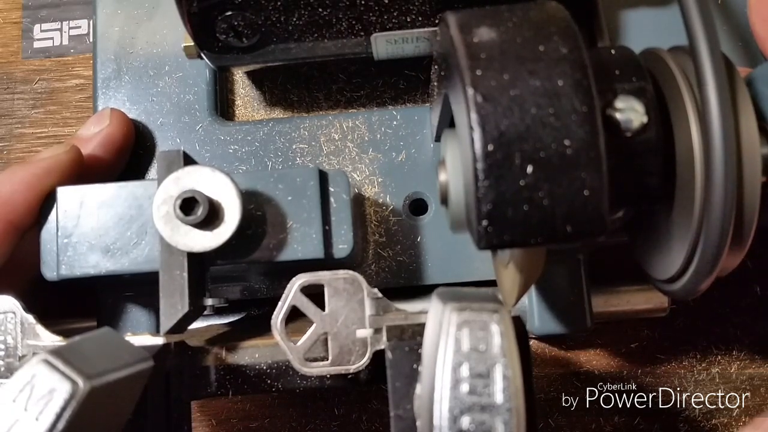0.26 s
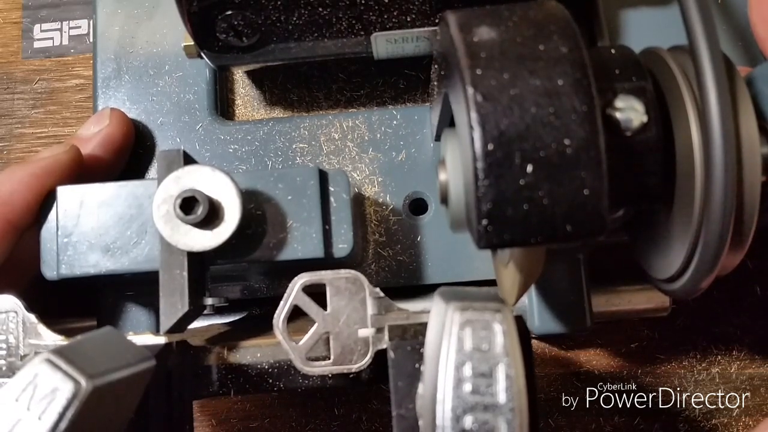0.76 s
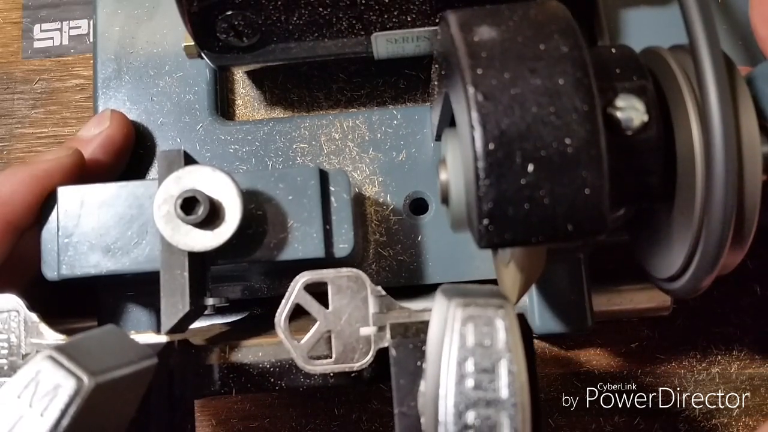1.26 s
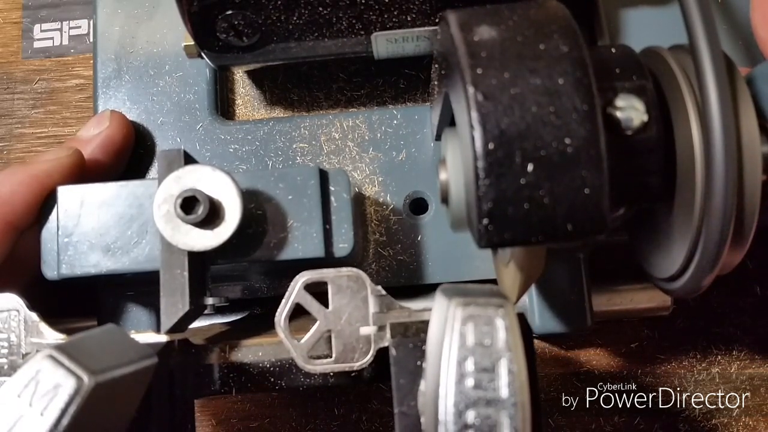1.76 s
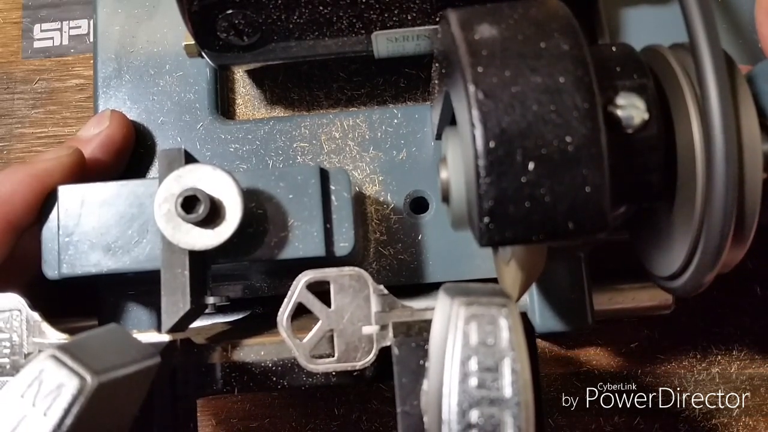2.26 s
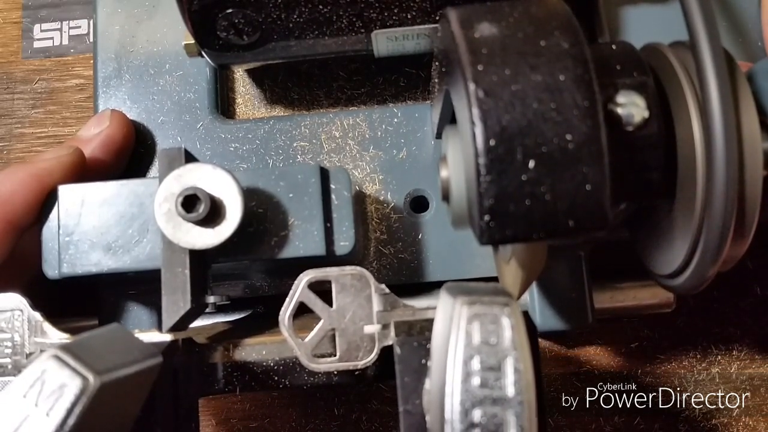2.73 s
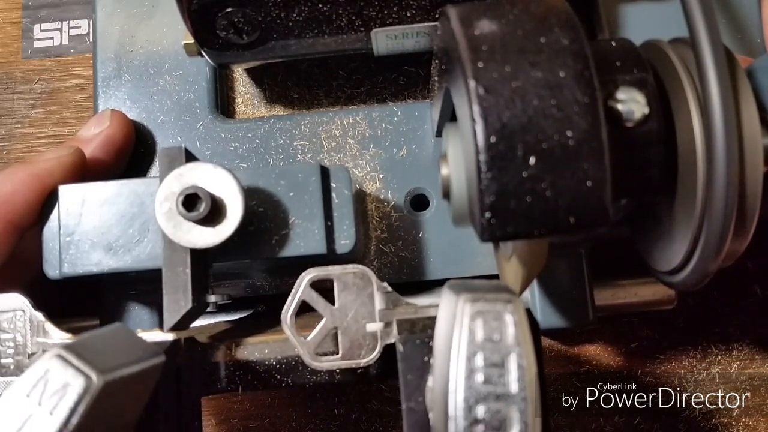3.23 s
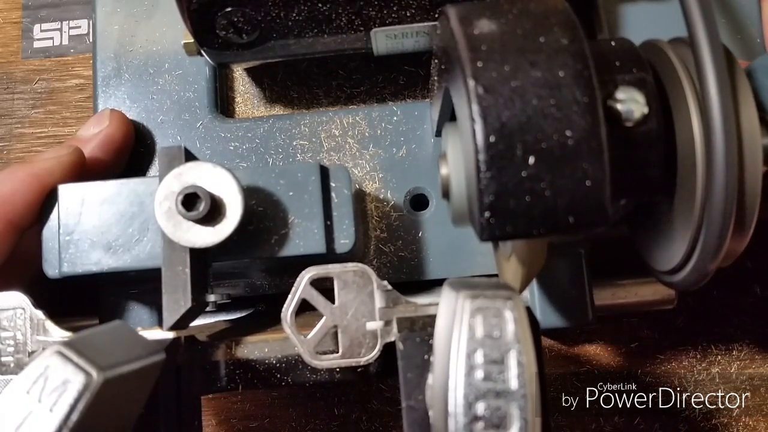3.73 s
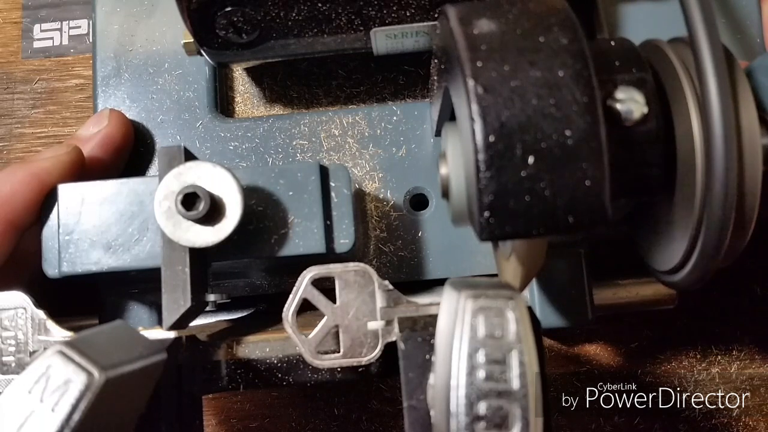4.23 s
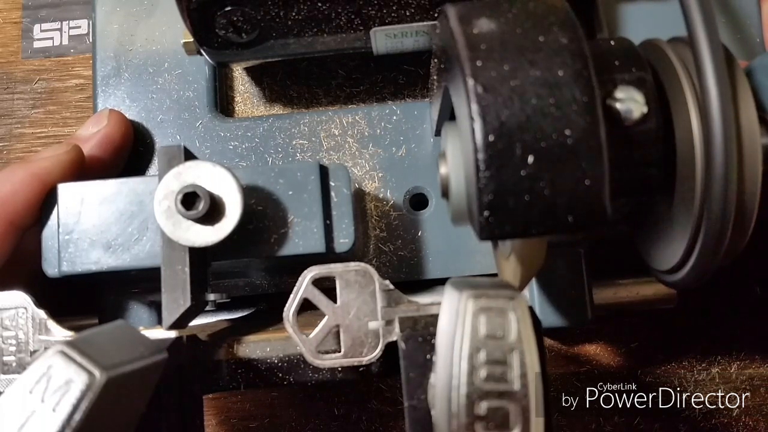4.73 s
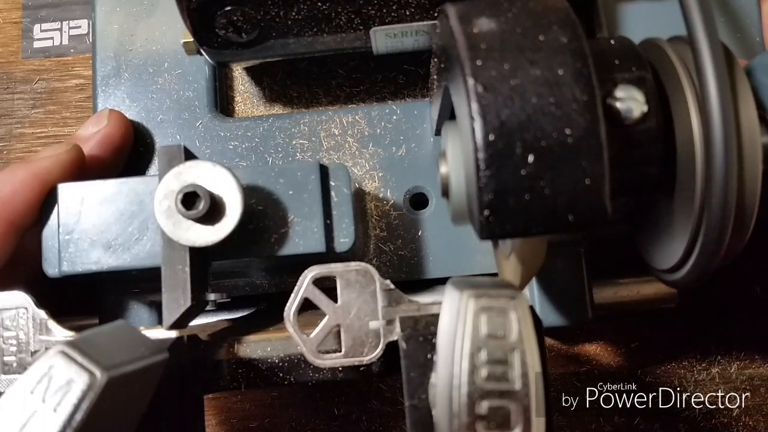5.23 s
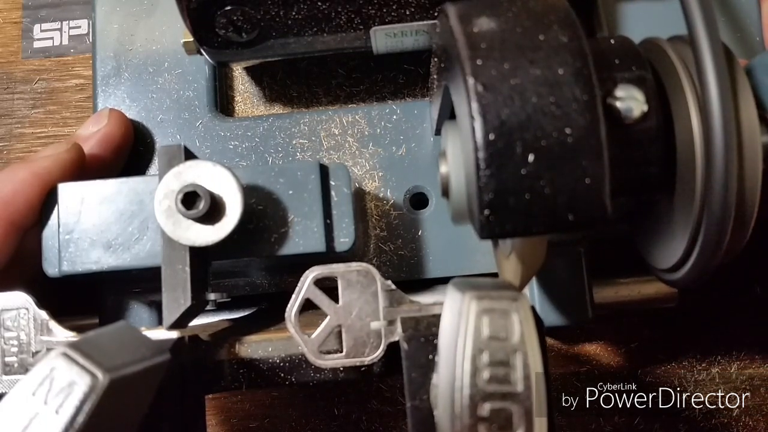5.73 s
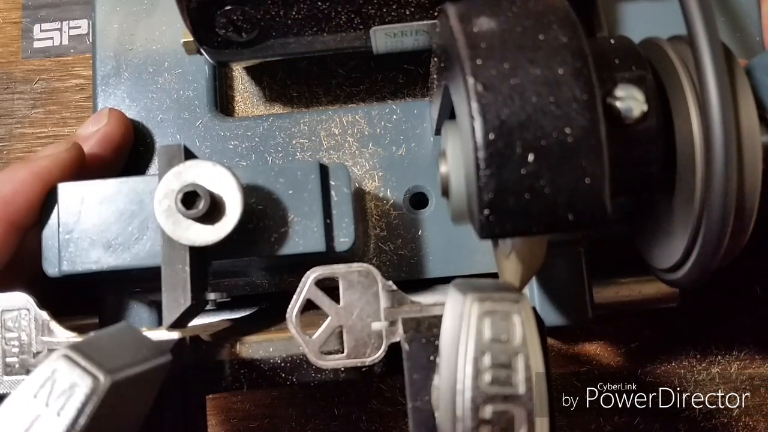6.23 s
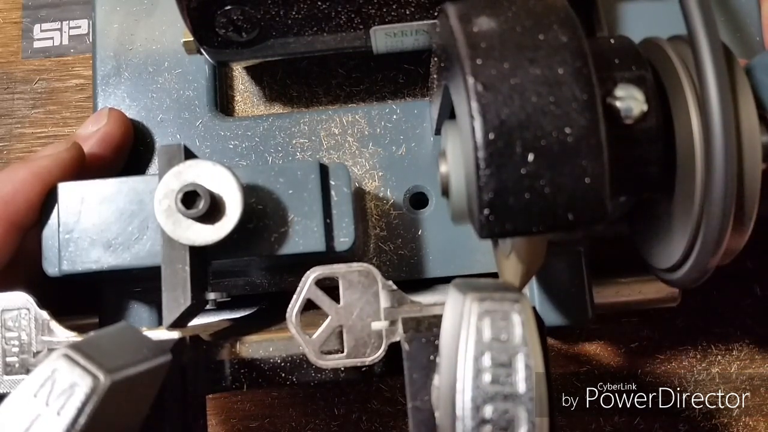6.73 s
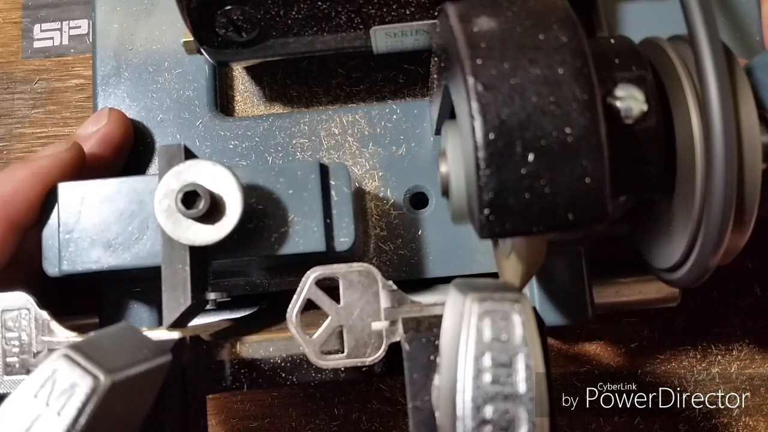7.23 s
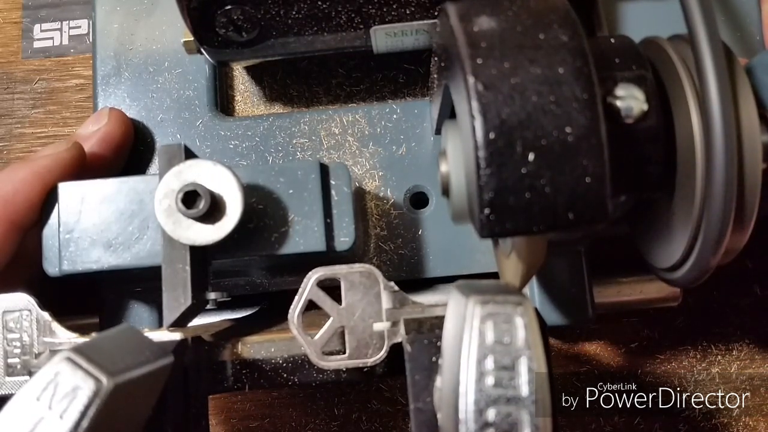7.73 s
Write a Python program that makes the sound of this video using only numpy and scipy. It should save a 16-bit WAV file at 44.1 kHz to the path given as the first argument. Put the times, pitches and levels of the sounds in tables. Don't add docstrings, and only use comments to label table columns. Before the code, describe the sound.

Continuous low motor drone with a rough grinding bed and rapid, grouped metal chatter as a small bench machine cuts a key, never stopping.

```python
import sys
import numpy as np
from scipy import signal
from scipy.fft import rfft, irfft, next_fast_len
from scipy.io import wavfile
from scipy.ndimage import uniform_filter1d, minimum_filter1d

SR = 44100
rng = np.random.default_rng(int(sys.argv[2]) if len(sys.argv) > 2 else 0)


def ratio_of_db(decibels):
    return 10 ** (np.asarray(decibels, float) / 20)


def pcm_store(signal):
    levels = np.round(np.clip(np.atleast_2d(signal), -1, 1) * 32767)
    wavfile.write(sys.argv[1], SR, levels.astype(np.int16).T)


N = 351918
COARSE = 40
MAINS_PULL_HZ = 120

# start_s, first_order_db, second_order_db
HUM_LEVELS = [(0, -10, -16), (.6, -9, -17), (1.2, -9.5, -17), (1.5, -12.5, -16), (1.85, -12, -15.5),
              (2.05, -10, -16), (2.6, -10, -16.5), (3.2, -9.5, -15.5), (3.55, -12.5, -16), (4.3, -12, -15),
              (5.2, -12, -14.5), (5.75, -12, -13.5), (6.3, -14, -13.5), (7, -12, -13.5),
              (7.98, -12.4, -12.5)]


def in_time(rows):
    s, *columns = np.transpose(rows)
    return [np.interp(np.arange(N) / SR, s, column) for column in columns]


def rms_one(x):
    return x / np.sqrt(np.mean(x ** 2) + 1e-20)


def turns(hz):
    return 2 * np.pi * np.cumsum(hz) / SR


def drift(rate_hz):
    r = np.exp(-2 * np.pi * COARSE * rate_hz / SR)
    noise = rng.standard_normal(N // COARSE + 2002)
    slow = signal.lfilter([1], [1, -2 * r, r * r], noise)[2000:]
    return np.interp(np.arange(N) / COARSE, np.arange(len(slow)), rms_one(slow - slow.mean()))


def spell(start_s, end_s):
    settle_s = 0.092
    s = np.arange(0, N, COARSE) / SR
    on = (np.tanh((s - start_s) / settle_s) - np.tanh((s - end_s) / settle_s)) / 2
    return np.interp(np.arange(N) / SR, s, on)


def lifted():
    # at_s, level_db (negative dips, positive lifts the group)
    lifts = [(0.92, -7.5), (1.194, -4.5), (1.461, -14), (1.64, -22.5), (1.685, -7), (1.958, -2),
             (2.188, -20), (2.641, -8.5), (2.865, -15.5), (3.092, -12.5), (3.229, -7.5), (3.365, -2),
             (3.723, -7), (3.858, -8), (3.948, -7), (4.084, -7), (4.353, -13.5), (4.487, -8), (4.621, 0.5),
             (4.666, -12.5), (5.343, -14.5), (5.615, -10), (5.69, -14), (5.791, -16), (6.241, -2),
             (6.656, -9.5), (7.482, -24), (7.755, -20)]
    s = np.arange(0, N, COARSE) / SR
    dips = sum(db * np.exp(-((s - at_s) / 0.019) ** 4) for at_s, db in lifts)
    return np.interp(np.arange(N) / SR, s, dips)


def colour(x, points, humps=()):
    size = next_fast_len(N)
    hz = np.fft.rfftfreq(size, 1 / SR) + 1
    points_hz, points_db = np.transpose(points)
    gain_db = np.interp(np.log(hz), np.log(points_hz), points_db)
    for centre_hz, width_hz, db in humps:
        gain_db += db / (1 + (2 * (hz - centre_hz) / width_hz) ** 2)
    return irfft(rfft(x, size) * ratio_of_db(gain_db), size)[:N]


def sine(phase, rms_db):
    return np.sqrt(2) * ratio_of_db(rms_db) * np.cos(phase)


def tone(phase, rms_db, unsteady_db):
    level_db = rms_db + unsteady_db * drift(2.4)
    return sine(phase + rng.uniform(0, 2 * np.pi) + 0.33 * drift(3.0), level_db)


def hum(tooth, wobble):
    # tooth_multiple, wobble_multiple, resting_db, share_of_second_swing
    seated_tones = [(3, 0, -43.5, .1), (4, 0, -51, -.1), (5, 0, -49, .3), (6, 0, -30, 1.2),
                    (10, 0, -38.5, .9), (1, -1, -48, .1)]
    # start_s, end_s, tooth_multiple, level_db
    seating = [(0.36, 1.05, 3, 9), (1.46, 1.8, 3, 7.5), (2.95, 3.55, 3, 9.5), (4.7, 6.2, 3, 9.5),
               (6.5, 7.8, 3, 9), (7.2, 8.2, 3, 6), (1, 6.5, 4, 16.5), (2.95, 3.5, 5, 8.5), (1.1, 17, 5, 8),
               (5.3, 7, 5, 5), (3.5, 7.5, 1, 7.5), (5.5, 6, 1, 2)]
    # tooth_multiple, level_db
    upper = [(7, -37), (8, -39), (9, -41), (11, -44), (12, -46), (13, -48), (20, -57)]
    first_db, second_db = in_time(HUM_LEVELS)
    lead = 2.35 + .16 * (first_db - first_db.mean())
    out = sine(tooth, first_db + 0.5 * drift(13) + 0.36 * drift(1.4))
    second_phase = 2 * tooth + lead + 0.3 * drift(0.83)
    out += sine(second_phase, second_db + 0.56 * drift(9) + .7 * drift(5.8))
    swing_db = second_db - second_db.mean()
    for a, b, rest_db, share in seated_tones:
        seated_db = sum(up_db * spell(start_s, end_s) for start_s, end_s, k, up_db in seating if k == a)
        out += tone(a * tooth + b * wobble, rest_db + seated_db + share * swing_db, unsteady_db=.8)
    for k, db in upper:
        out += tone(k * tooth, db - .8, unsteady_db=3.0)
    return out


def side_tones(tooth, wobble):
    # tooth_multiple, wobble_multiple, mains_pull_multiple, level_db
    mixtures = [(0, 0, 1, -49), (0, 1, 0, -53.5), (1, 1, 0, -34), (1, 2, 0, -40), (1, 3, 0, -42),
                (2, -1, 0, -39), (2, 0, -1, -36), (2, 1, 0, -40), (3, -2, 0, -35), (3, -1, 0, -39.5),
                (3, 0, -1, -39.5), (3, 0, 1, -44), (4, -2, 0, -44.5), (4, 0, 1, -51), (4, 0, 2, -51),
                (4, 2, 0, -46), (5, 0, 1, -50.5), (5, 0, 2, -51), (8, 0, 2, -44.5), (10, 0, 1, -40),
                (10, 0, 2, -42.5), (11, 0, 1, -53), (11, 0, 2, -55.5), (20, 0, -1, -62), (20, 0, 1, -59)]
    pull = turns(np.full(N, MAINS_PULL_HZ))
    return sum(tone(a * tooth + b * wobble + c * pull, db - 0.5, unsteady_db=3.0)
               for a, b, c, db in mixtures)


def whines():
    # pitch_hz, level_db, wander_hz
    rotor = [(177.3, -47.5, 0.16), (220.3, -43.5, 0.18), (241.7, -41.5, 0.21), (303, -46, 0.72)]
    # pitch_hz, level_db, wander_hz
    whistles = [(7715, -77, 6), (8495, -75, 6), (9001, -75, 6), (10471, -78, 5), (11197, -81, 5),
                (11573, -81, 6), (11730, -78, 5), (12125, -77, 8), (13776, -86, 5), (14660, -81, 10),
                (14700, -79, 8), (14880, -86, 8)]
    return sum(sine(turns(hz + wander_hz * drift(7.0)), db + 3.6 * drift(1.1))
               for hz, db, wander_hz in [*rotor, *whistles])


def knocks(tooth, wobble, knock_db, bright_db):
    # pitch_hz, width_hz, level_db
    modes = [(1220, 830, -3), (1577, 170, 5.5), (1940, 390, -12.5), (2420, 68, -2), (2590, 100, -3),
             (2806, 55, -2), (3003, 96, -2.5), (3265, 100, 2.5), (3430, 83, -8), (4050, 190, -11),
             (4170, 950, -17.5), (4860, 270, -14.5), (5370, 82, -11), (5800, 150, -12.5),
             (5890, 120, -13.5), (6230, 46, -23), (8500, 710, -27.5)]
    # start_s, grip (0-1)
    key_grip = [(0, 0), (1, 0.5), (1.6, 0.6), (2.5, 0.7), (3.5, 0.7), (4.5, 0.6), (5.3, 0.8), (5.8, 1),
                (6.3, .95), (6.7, 0.8), (7.1, 0.3), (7.98, 0.6)]
    knock_at, lean_at = 3.95, 5.45
    jaw_hz, vice_above_hz = 3300, 4500
    at = np.flatnonzero(np.diff(np.floor((tooth - knock_at) / (2 * np.pi))) > 0)
    luck = rng.standard_normal((len(at), 3 + 2 * len(modes)))
    grip = np.clip(in_time(key_grip)[0], 0, 1)
    out_of_step = (.1 + .6 * spell(1.9, 5.7)) * drift(8.0)
    lean = np.cos(wobble[at] - lean_at + out_of_step[at])
    strength_db = 12 * np.tanh(2.4 * (lean - .62 + .4 * grip[at]))
    strength_db += 5 * (1 - grip[at]) * lean + 1.2 * luck[:, 0]
    at = at + (SR * (.0008 * (1 - lean) + .0002 * luck[:, 1])).astype(int)
    bounce = at + (SR * (.0021 + .0003 * luck[:, 2])).astype(int)
    at, bounce = np.clip(at, 0, N - 1), np.clip(bounce, 0, N - 1)
    fade = np.exp(-1 / (0.0015 * SR))
    scatter, out = rng.standard_normal(N), np.zeros(N)
    for k, (hz, width_hz, db) in enumerate(modes):
        vice = hz > vice_above_hz
        bounce_db = 0 if vice else -6
        blows = np.full(N, 1e-18)
        blows[at] = ratio_of_db(strength_db + db + 1.2 * luck[:, 3 + 2 * k])
        blows[bounce] = ratio_of_db(strength_db + db + bounce_db + 2 * luck[:, 4 + 2 * k])
        chatter = blows + .085 * np.roll(scatter, 997 * k) * signal.lfilter([1], [1, -fade], blows)
        r, w = np.exp(-np.pi * width_hz / SR), 2 * np.pi * hz / SR
        ringing = signal.lfilter([0, np.sin(w)], [1, -2 * r * np.cos(w), r * r], chatter)
        if abs(hz - jaw_hz) < 120:
            ringing *= ratio_of_db(7.9 * (grip - 0.84))
        vice_gain = ratio_of_db(bright_db + 10.0) if vice else 1
        out += (-1) ** k * np.sqrt(width_hz / 130) * ringing * vice_gain
    even = np.sqrt(uniform_filter1d(out ** 2, size=SR // 5))
    blunt = signal.butter(2, 8000, fs=SR, output="sos")
    return ratio_of_db(knock_db + 4.5) * signal.sosfilt(blunt, out / even)


def rumble(tooth, wobble, rumble_db, knock_db):
    # pitch_hz, level_db
    milling = [(20, -62.5), (60, -40), (110, -24), (160, -13), (330, -15), (520, -16), (1000, -20.5),
               (1700, -18), (2300, -22.5), (3500, -30), (5000, -36), (6400, -42), (7000, -58.5),
               (9000, -91)]
    # pitch_hz, width_hz, level_db
    bench = [(180, 25, 2.5), (262, 82, 5.5), (378, 69, 7.5), (475, 43, 1), (638, 64, 6.5), (797, 25, 5),
             (1176, 390, 5.5)]
    bed = rms_one(colour(rng.standard_normal(N), milling, bench))
    low = signal.sosfiltfilt(signal.butter(2, 900, fs=SR, output="sos"), bed)
    top = signal.sosfiltfilt(signal.butter(2, 2500, "high", fs=SR, output="sos"), bed)
    middle = bed - low - top
    throb = ratio_of_db(.9 * np.cos(tooth - 5.5) + .8 * np.cos(wobble - 5.8) + .4 * drift(25))
    throb *= ratio_of_db(0.66 * np.cos(turns(np.full(N, MAINS_PULL_HZ))))
    second_db = in_time(HUM_LEVELS)[1]
    low *= ratio_of_db(0.68 * (second_db - second_db.mean()))
    follow = ratio_of_db(.4 * (knock_db - knock_db.mean()) + .15 * lifted())
    return ratio_of_db(rumble_db + 1.0) * (low * ratio_of_db(1.6 * drift(14)) + throb * (middle + follow * top))


def hiss(tooth, wobble):
    # pitch_hz, level_db
    air = [(5000, -12.5), (6600, 1), (7400, -7.5), (8500, -4.5), (10000, -11), (11500, -11.5),
           (12400, -4.5), (12800, -4.5), (13000, -15.5), (14400, -17), (15000, -21), (15400, -24)]
    throb = ratio_of_db(1.5 * np.cos(tooth - .3) + 0.46 * np.cos(wobble - 5.8) + 0.91 * drift(22))
    throb *= ratio_of_db(.7 * np.cos(tooth - 2 * wobble + 6.3) + .08 * lifted())
    return ratio_of_db(-54.5) * rms_one(colour(rng.standard_normal(N), air) * throb)


def scene():
    # start_s, tooth_rate_hz
    speed = [(0, 182.62), (.614, 182.84), (1.228, 183.48), (1.842, 183.23), (2.455, 183.49),
             (3.069, 183.75), (3.683, 184.01), (4.297, 183.54), (4.911, 183.76), (5.525, 183.69),
             (6.138, 183.38), (6.752, 182.98), (7.366, 183.43), (7.98, 184.26)]
    # at_s, step_rad
    slips = [
        (-.2, .15),
        (1.0, -.45),
        (3.0, .45),
        (4.0, -.45),
        (5.0, -.15),
        (6.0, .15),
        (7.0, .7),
    ]
    # start_s, knock_db
    contact = [(0, -33.5), (.2, -32.5), (.9, -34), (1.2, -33.5), (1.65, -32.5), (1.95, -38), (2.15, -33.5),
               (2.5, -36), (2.85, -33), (3.1, -36), (3.5, -36.5), (4.4, -35.5), (5.2, -36), (5.7, -34.5),
               (5.95, -31.5), (6.7, -33.5), (7.3, -33.5), (7.98, -33.5)]
    # start_s, end_s, level_db
    vice_spells = [
        (-.2, 1.0, 0.5),
        (1.9, 4.3, -1.5),
        (5.3, 7.4, 1.5),
        (5.85, 7.05, 2.5),
    ]
    tooth_hz, = in_time(speed)
    wobble_hz = 80.695 + .217 * (tooth_hz - 183.45)
    tooth = -1.1 + turns(tooth_hz)
    wobble = -.5 + turns(wobble_hz) + sum(step * spell(at_s, np.inf) for at_s, step in slips)

    knock_db, = in_time(contact)
    bright_db = -10.5 - 0.31 * (knock_db - knock_db.mean())
    bright_db += sum(db * spell(start_s, end_s) for start_s, end_s, db in vice_spells)
    rumble_db = -23.5 + drift(7.3) + spell(3.6, 7.0)

    machine = hum(tooth, wobble) + side_tones(tooth, wobble) + whines()
    machine += knocks(tooth, wobble, knock_db + lifted(), bright_db)
    machine += rumble(tooth, wobble, rumble_db, knock_db) + hiss(tooth, wobble)
    return np.array([machine, machine])


def low_pass(x):
    return signal.sosfilt(signal.butter(12, 15440, fs=SR, output="sos"), x)


def record(dry):
    # pitch_hz, left_minus_right_db
    shadow = [(200, 0.14), (1000, 0.34), (2000, 1.4), (3000, 3), (4000, 6.5), (5300, 10), (6400, 9.5),
              (7300, 4.5)]
    alike_above_hz = 7560
    shadow = [*shadow, (alike_above_hz, shadow[-1][1]), (alike_above_hz + 1, 0)]
    left = [(hz, 20 * np.log10(2 / (1 + ratio_of_db(-db)))) for hz, db in shadow]
    right = [(hz, 20 * np.log10(2 / (1 + ratio_of_db(db)))) for hz, db in shadow]
    ports = np.array([colour(dry[0], left), colour(dry[1], right)])
    headroom = np.minimum(1, .92 / (np.abs(ports).max(axis=0) + 1e-9))
    mix = ports * uniform_filter1d(minimum_filter1d(headroom, size=401), size=401)
    return low_pass(mix)


dry = scene()
out = record(dry)
pcm_store(out)
```